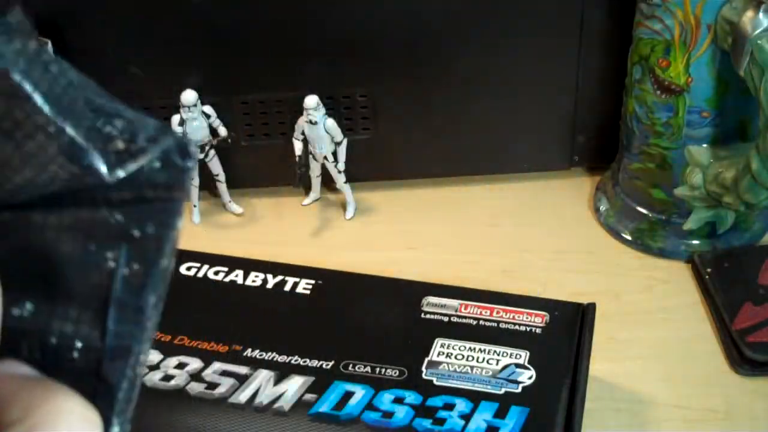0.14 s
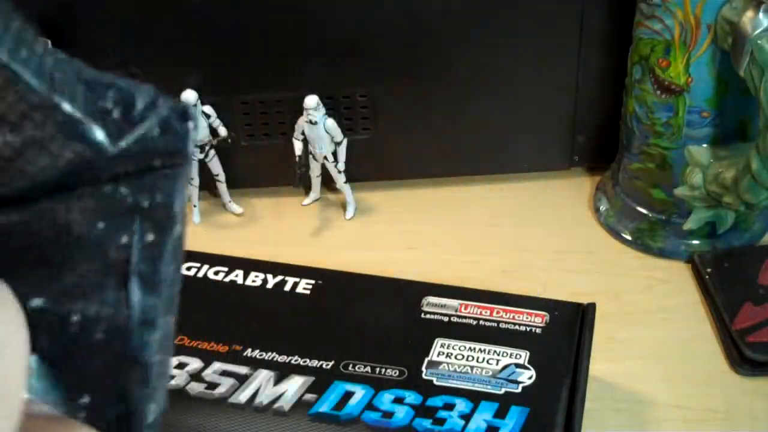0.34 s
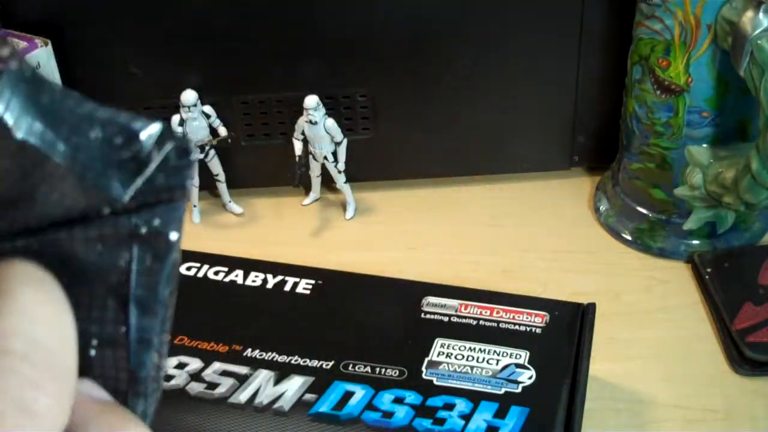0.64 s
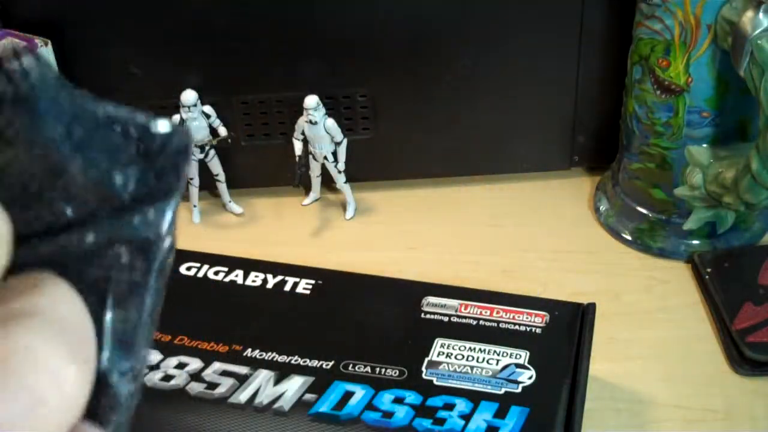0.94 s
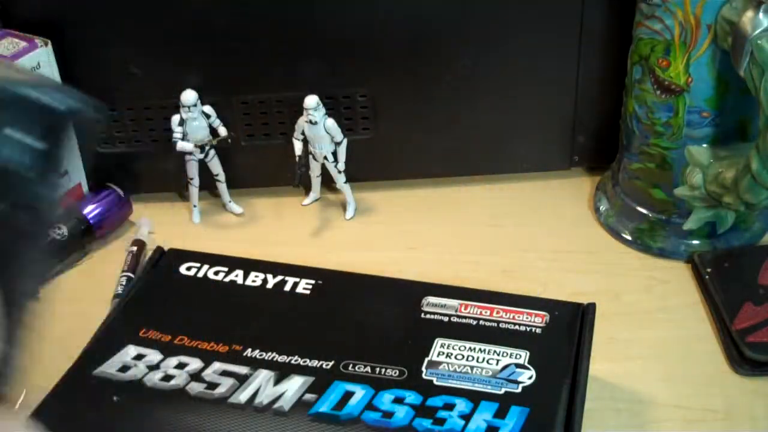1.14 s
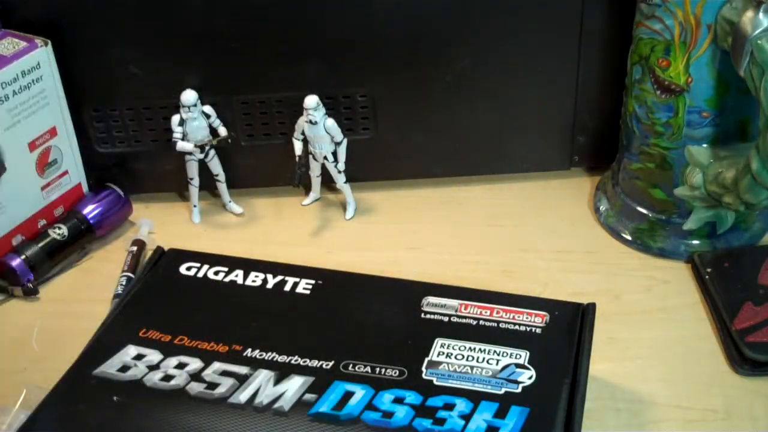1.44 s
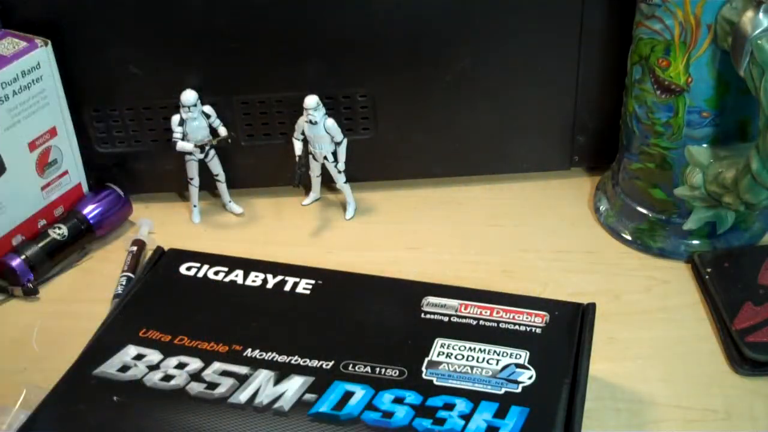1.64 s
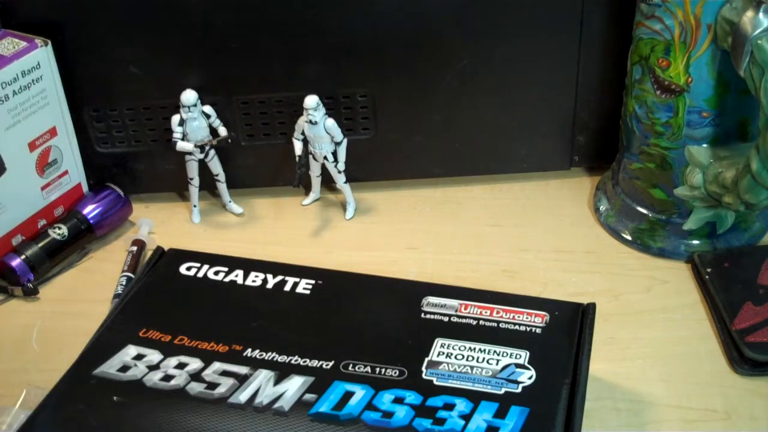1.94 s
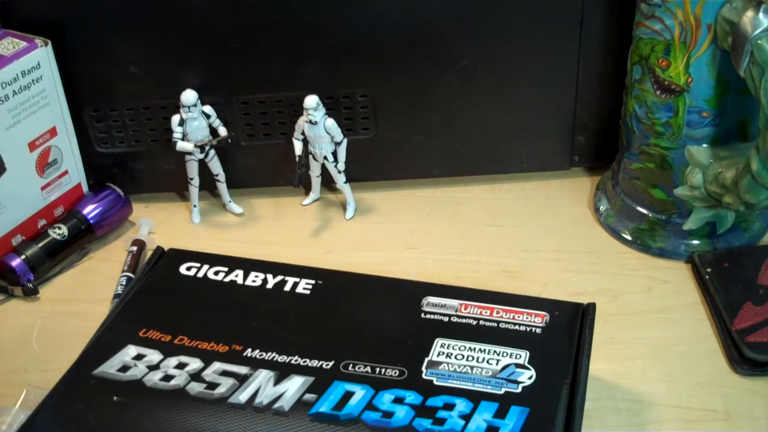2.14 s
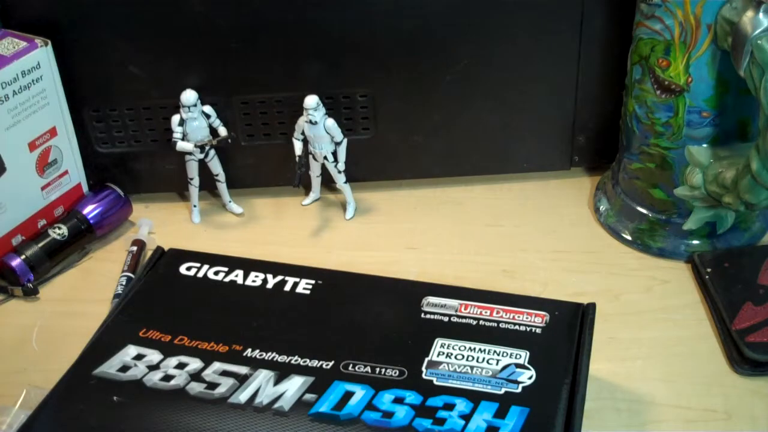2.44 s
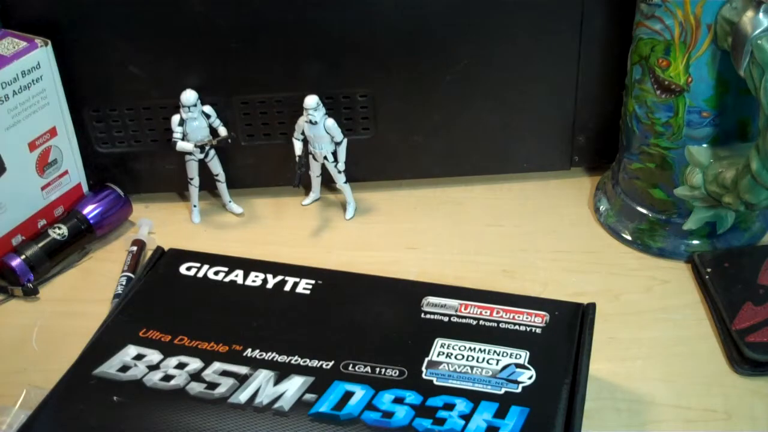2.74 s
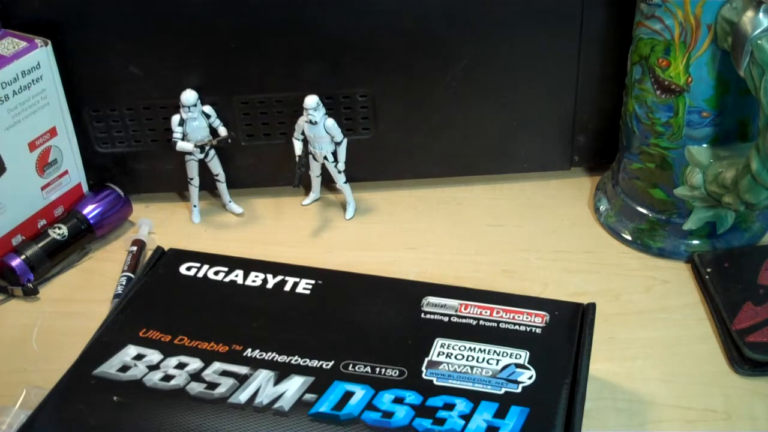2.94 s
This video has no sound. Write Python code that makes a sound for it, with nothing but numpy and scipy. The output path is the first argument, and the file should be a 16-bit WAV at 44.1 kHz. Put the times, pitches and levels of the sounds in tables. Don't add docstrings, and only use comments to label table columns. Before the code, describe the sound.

A stiff foil-like plastic bag crackles close by, slightly left, in a small dry room. Sharp snaps cluster from 0.1 to 0.6 seconds, with a boxy pop near 0.5. It thins until about 1.0, then kneading crackles continue, with a hard snap near 2.0. A tiny squeak at 2.6 leads into dense, loud rustling around 2.7 and 3.0. Treble is piercing; the loudest snaps overload.

```python
import sys
import numpy as np
from scipy import signal
from scipy.fft import rfft, irfft
from scipy.io import wavfile
from scipy.ndimage import uniform_filter1d, map_coordinates

SR = 44100
rng = np.random.default_rng(int(sys.argv[2]) if len(sys.argv) > 2 else 0)


def to_wav(sig):
    pcm = np.clip(np.atleast_2d(sig), -1, 1) * 32767
    pcm = np.round(pcm).astype(np.int16)
    wavfile.write(sys.argv[1], SR, pcm.T)


def ratio_of_db(decibels):
    return 10 ** (np.asarray(decibels, float) / 20)


N = 136710


def band(x, hz, width):
    b, a = signal.iirpeak(hz, 1 / np.clip(width, .01, 1.5), fs=SR)
    return signal.lfilter(b, a, x)


def highpass(x, order, hz):
    return signal.lfilter(*signal.butter(order, hz, "high", fs=SR), x)


def unit(x):
    return x / np.sqrt(np.mean(x ** 2))


def sparks(share, spread_db, size):
    chance, side, size_draw = rng.random((3, size))
    strength = np.minimum(-np.log(1 - size_draw), 2.9)
    return (chance < share) * np.sign(side - .5) * ratio_of_db(spread_db * strength)


def wander(rate):
    hold = int(SR / rate)
    steps = np.repeat(rng.standard_normal(N // hold + 1), hold)
    slewed = uniform_filter1d(uniform_filter1d(steps, hold), hold // 2)
    return unit(slewed[:N])


def room_hush():
    murmur, rumble = [], []
    for _ in range(2):
        murmur.append(ratio_of_db(-63) * unit(band(rng.standard_normal(N), 430, 4.5)))
        rumble.append(ratio_of_db(-72) * unit(band(rng.standard_normal(N), 60, 1.7)))
    return np.array(murmur) + np.array(rumble)


def grains(effort_db):
    per_s, spread_db, grain_ms = 200, 5, 1.0
    fade = np.exp(-1000 / SR / grain_ms)
    bursts = signal.lfilter([1], [1, -fade], abs(sparks(per_s / SR, spread_db, N)))
    bed = ratio_of_db(effort_db + 36) + 0.57
    density = (unit(bursts) + bed) / np.hypot(1, bed)
    patches = ratio_of_db(3.5 * wander(18))
    return density * patches * rng.standard_normal((2, N))


# t/s, rustle level/dB, muffled share level/dB
HAND_EFFORT = [(0, -47, 7), (.13, -45.5, 8.5), (.4, -37.5, -3.5), (.58, -60, 21.5), (.7, -52.5, 12.5),
               (.82, -47, 2.5), (.95, -44, -4.5), (1.08, -37.5, -7), (1.25, -49, 1.5), (1.42, -45.5, 3),
               (1.85, -44.5, -3), (2.02, -41.5, -9.5), (2.4, -50, 6.5), (2.63, -42, 8.5),
               (2.72, -25.5, 1.5), (2.89, -40, 7.5), (2.99, -26, -1.5), (3.1, -43, -0.5)]


def rustle(t):
    when, level, muffled = np.array(HAND_EFFORT, float).T
    effort_db = np.interp(t, when, level)
    flurry_db = 1.5 * wander(45)
    open_film = 0.28 * grains(effort_db)
    bright = 0.54 * unit(band(grains(effort_db), 9200, 1.0))
    middle = 0.55 * unit(band(grains(effort_db), 3440, 0.68))
    dull = unit(band(grains(effort_db), 1640, 1.38))
    flapping = ratio_of_db(-9) * unit(band(grains(effort_db), 323, 2.95))
    folds = ratio_of_db(np.interp(t, when, muffled)) * (dull + flapping)
    return ratio_of_db(effort_db + 0.5 + flurry_db) * (open_film + bright + middle + folds)


# t/s, peak level/dB, panel ring level under it/dB, panel f/Hz,
# cluster length/ms
CREASE_SNAPS = [(0.0474, -28, -11.5, 3580, 1.3), (0.0672, -30.5, -7, 3300, 1.3),
                (0.0931, -6, -22.5, 2900, 1.2), (0.1097, -5.5, -24.5, 4000, 0.84),
                (0.1369, -14.5, -11, 2800, 0.76), (0.2108, -7.5, -14.5, 2730, 1.1),
                (0.2471, -15.5, -9.5, 2900, 1.8), (0.2654, -23, -8.5, 3000, 2.4),
                (0.276, -6, -20.5, 2850, 0.75), (0.2843, -2, -27.5, 2370, 7.2),
                (0.3326, -2, -36, 3600, 6.1), (0.3407, -2, -41, 3590, 3), (0.363, -12, -31, 3100, 3.4),
                (0.379, -3, -58, 3834, 0.66), (0.41, -7, -49, 3850, 0.53), (0.4491, 0, -27.5, 3720, 2.3),
                (0.4647, -6, -20.5, 2600, 0.64), (0.489, -10.5, -44, 2950, 1.2),
                (0.5171, -11.5, -15.5, 1990, 1.8), (0.5299, -24, -1.5, 2550, 2.1),
                (0.552, -5, -18.5, 2410, 4.4), (0.614, -25.5, -7, 3040, 0.58),
                (0.7259, -9, -20.5, 3000, 1), (0.7522, -12, -24, 2040, 1.9),
                (0.9948, -25, -5, 1940, 3.7), (1.0097, -15.5, -33, 3260, 1),
                  (1.0644, -6.5, -52, 3520, 0.22), (1.0889, -1.5, -46, 3920, 2.9),
                  (1.1117, -3, -33.5, 4040, 1.34), (1.166, -14, -19.5, 1670, 7.4),
                  (1.2079, -12, -24, 3300, 0.79), (1.2771, -13, -21, 3460, 0.79),
                  (1.3047, -6.5, -20, 2300, 3.4), (1.3539, -11.5, -25, 2580, 5.2),
                  (1.3821, 2.5, -34, 4200, 2.9), (1.4005, -3, -24, 1610, 1.1),
                  (1.4158, -3, -27.5, 3960, 4.4), (1.4497, -6.5, -49, 3190, 0.62),
                  (1.525, -10.5, -13.5, 3900, 2.4), (1.547, -13, -28, 3080, 2.9),
                  (1.5983, -9, -17.5, 1510, 0.57), (1.681, -13, -51, 2650, 1.2),
                  (1.7042, -6.5, -21.5, 3600, 1.5), (1.7908, -8, -21, 2190, 3.6),
                  (1.808, -22.5, -5.5, 3100, 2.4), (1.844, -20, -36, 3200, 4.2),
                (1.8839, -4, -57, 3850, 1.8), (1.9167, -0.5, -46, 3400, 4.4),
                 (1.976, -13, -20.5, 3320, 1.3), (1.9869, 9, -31.5, 3100, 1.9),
                 (2.0286, -7, -14, 4340, 2.9), (2.0421, -8, -45, 3900, 1.5), (2.087, -8.5, -43, 4300, 1.2),
                 (2.152, -31.5, -4.5, 1640, 2), (2.188, 1, -17.5, 3080, 5.7), (2.1976, -2.5, -37, 1800, 1),
                 (2.211, -12, -23, 2700, 4.6), (2.243, -6.5, -30, 3810, 1.7), (2.2905, -19, -27, 2900, 4.1),
                 (2.337, -9, -25.5, 3730, 0.65), (2.4388, -6, -31, 3470, 3.1),
                 (2.5177, -10, -17, 1600, 2.8), (2.581, -15, -22, 3500, 2.7),
                 (2.6584, -9.5, -5.5, 2080, 1.7), (2.6828, 7.5, -13.5, 2760, 2.16),
                 (2.768, 3, -29, 2200, 4), (2.8202, -5.5, -40, 2520, 4.8), (2.8388, -10.5, -21, 2420, 1.7),
                 (2.9, -12.5, -50, 2340, 0.55), (3.0837, -6, -34, 3040, 0.27)]
# t/s, peak level/dB
LESSER_TICKS = [(0.2256, -22), (0.4465, -11), (0.5348, -20), (0.5557, -6.5), (0.574, -20), (0.6282, -30),
                (0.733, -25), (1.3316, -21.5), (1.464, -39), (1.8968, -19), (2.0028, -25), (2.2536, -23),
                (2.6799, -3.5), (2.728, -14), (2.7806, -12.5), (2.918, -18), (2.9792, -14.5), (3.007, -12)]
# t/s, peak level/dB, fold f/Hz
FAINT_TICKS = [(0.0978, -16, 3100), (0.131, -16.5, 2930), (0.1405, -10.5, 2580), (0.1598, -10.5, 2450),
               (0.221, -18, 3010), (0.2706, -9, 2070), (0.39, -18, 3880), (0.3975, -17, 2070),
               (0.4262, -15, 4500), (0.435, -19, 4700), (0.4538, -25, 3270), (0.536, -14, 2330),
               (0.6327, -28, 4130), (0.6673, -21, 1550), (0.69, -22, 2240), (0.8136, -36, 3270),
               (0.846, -45, 1890), (0.9611, -30, 3100), (1.0345, -19.5, 4820), (1.0685, -7, 3400),
               (1.091, -23, 3620), (1.166, -26, 1290), (1.2502, -27, 2240), (1.6298, -15, 950),
               (1.6393, -15, 3280), (1.6877, -25, 3790), (1.7197, -20.5, 4050), (1.7316, -19.5, 3530),
               (1.876, -14, 2150), (2.1195, -26, 4700), (2.1704, -19, 1720), (2.2824, -23, 4220),
               (2.326, -25, 1550), (2.369, -21, 4050), (2.4727, -19, 950), (2.4868, -21, 2930),
               (2.546, -39, 1540), (2.5861, -12.5, 4060), (2.7, -5, 2870), (2.741, -6, 2240),
               (2.7528, -9, 3450), (2.85, -18, 3880), (2.8635, -15, 2400), (2.8805, -29, 2070),
               (2.9223, -10, 1030), (3.024, -15, 1890), (3.0892, -18, 3880)]


def snaps():
    size, lead = 2600, 400
    out = np.zeros((2, N + size))
    ms = (np.arange(size) - lead) * 1000 / SR
    creaking = ratio_of_db(-20) * np.exp(-abs(ms) / 5.3)
    aftershocks = ratio_of_db(-16) * np.exp(-abs(ms) / 11.4)
    skirt = np.where(ms < 0, creaking, aftershocks)
    events = CREASE_SNAPS
    events = events + [(s, db, -12, 1500 * 4.45 ** rng.random(), 0.59) for s, db in LESSER_TICKS]
    events = events + [(s, db - 3, -17.5, hz, 1) for s, db, hz in FAINT_TICKS]
    for s, db, ring_db, hz, length_ms in events:
        start = int(s * SR) - lead
        cluster = (ms >= 0) * np.exp(-(ms / max(length_ms, .2)) ** 2)
        for path in out:
            clicks = cluster * sparks(.25, 3, size)
            clicks[lead] += 3.2
            clicks = clicks + skirt * sparks(0.22, 4, size)
            clicks = clicks / np.sqrt(np.sum(clicks ** 2))
            ring = band(clicks, hz, 0.47) * ratio_of_db(ring_db + 9.5 + 19.5)
            airy = clicks + ratio_of_db(-9) * np.diff(clicks, prepend=0)
            path[start:start + size] += ratio_of_db(db + 8.5) * (highpass(airy, 1, 1130) + ring)
    return out[:, :N]


# t/s, level/dB
CAPSULE_KICKS = [(.2104, -47), (0.3332, -44), (0.4492, -32), (1.112, -48), (1.3795, -49), (1.917, -43),
                 (1.986, -32), (2.027, -47), (2.187, -43), (2.6588, -36), (2.6845, -40)]


def kicks(t):
    width = 0.63 / 1000
    lurch = sum(ratio_of_db(db) * np.exp(-((t - s - width) / width) ** 2) for s, db in CAPSULE_KICKS)
    return lurch * ratio_of_db(np.array([[0], [-15]]))


# t/s, level/dB, f/Hz
WALL_POPS = [
    (.532, -1, 1000),
    (4.2, -20, 220),
    (1.986, -5.5, 1170),
    (1.1, -9.5, 190),
    (1.416, -10.5, 810),
    (2.188, -10, 165),
    (.449, -17.5, 500),
]


def pops(t):
    noise = rng.standard_normal(N)
    total = np.zeros(N)
    for s, db, hz in WALL_POPS:
        shove = noise * (t > s) * np.exp(-abs(t - s) / 0.0044)
        total += ratio_of_db(db) * band(shove, hz, 2.07)
    return total


def squeak(t):
    start_s, end_s, pitch_hz = 2.615, 2.615 + .045, 1600
    wobble = unit(uniform_filter1d(rng.standard_normal(N), 120))
    grit = unit(uniform_filter1d(rng.standard_normal(N), 120))
    hz = pitch_hz * (1 + .06 * wobble + t - end_s)
    phase = 2 * np.pi * np.cumsum(hz) / SR
    gate = np.clip((t - start_s) / 0.011, 0, 1) * np.clip((end_s - t) / 0.0038, 0, 1)
    tone = np.sin(phase) + ratio_of_db(1) * np.sin(2 * phase)
    return ratio_of_db(-31 + 3.7 * grit) * gate * tone


def room_echo(x):
    size, t60_s = 12000, 0.16
    tail = rng.standard_normal(size) * 1000. ** (-np.arange(size) / SR / t60_s)
    tail[:30] = 0
    tail = ratio_of_db(-13) * tail / np.sqrt(np.sum(tail ** 2))
    return signal.fftconvolve(x, tail)[:N]


def response(points, size=1024):
    hz, db = np.array(points, float).T
    f = np.maximum(np.arange(size // 2 + 1) * SR / size, 20)
    cepstrum = irfft(np.interp(np.log(f), np.log(hz), db) * np.log(10) / 20)
    cepstrum[1:size // 2] *= 2
    cepstrum[size // 2 + 1:] = 0
    return irfft(np.exp(rfft(cepstrum)))


# f/Hz, level/dB
LEFT_PORT_COLOUR = [(60, -14.5), (500, -11), (2200, -7.5), (4200, -5.5), (6400, 4), (7600, 10), (10000, -7),
                    (14000, -14.5)]
RIGHT_PORT_COLOUR = [(60, -32), (500, -21), (2200, -18.5), (4200, -17.5), (6500, -5), (8000, -20.5),
                     (9300, -41.5), (14000, -41)]


def scene():
    t = np.arange(N) / SR
    bag, round_about = highpass(snaps(), 1, 250) + rustle(t)
    bag = bag + squeak(t) + pops(t)
    late = map_coordinates(bag, [(t - 4e-5) * SR], mode="nearest")
    scattered = ratio_of_db(4) * highpass(round_about, 2, 3150)
    left = bag + room_echo(bag)
    right = late + scattered + room_echo(bag)
    left = signal.fftconvolve(left, response(LEFT_PORT_COLOUR))[:N]
    right = signal.fftconvolve(right, response(RIGHT_PORT_COLOUR))[:N]
    return 2 * np.array([left, right]) + room_hush() + kicks(t)


def top_cut(x):
    return signal.sosfilt(signal.butter(12, 15520, fs=SR, output="sos"), x)


def record(dry):
    x = signal.sosfilt(signal.ellip(6, .3, 32, 14000, fs=SR, output="sos"), dry)
    x = np.clip(x + 0.004 * abs(x) ** 3, -.99, .99)
    x = signal.sosfilt(signal.ellip(6, .3, 40, 16500, fs=SR, output="sos"), x)
    return top_cut(x)


dry = scene()
out = record(dry)
to_wav(out)
```